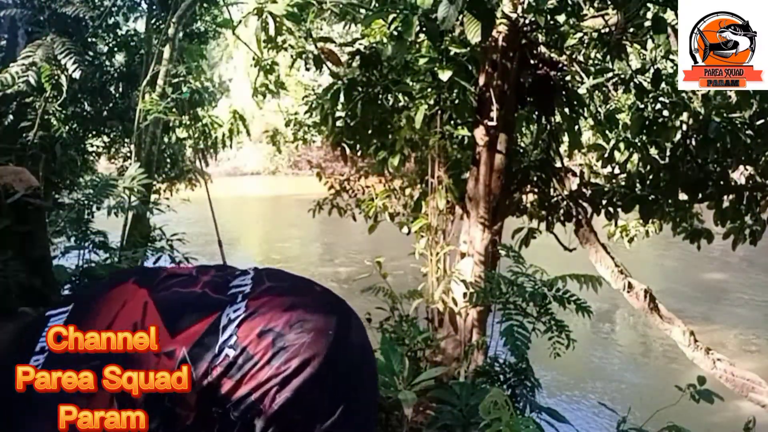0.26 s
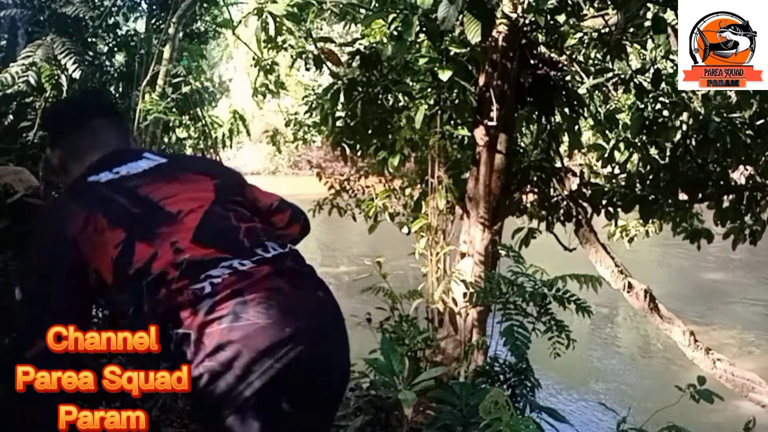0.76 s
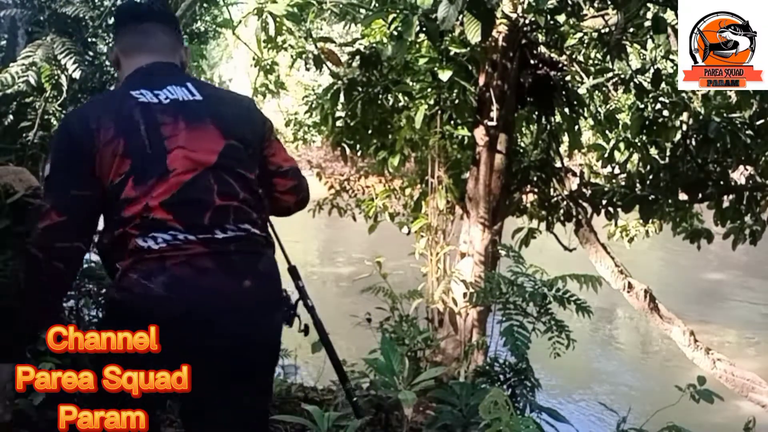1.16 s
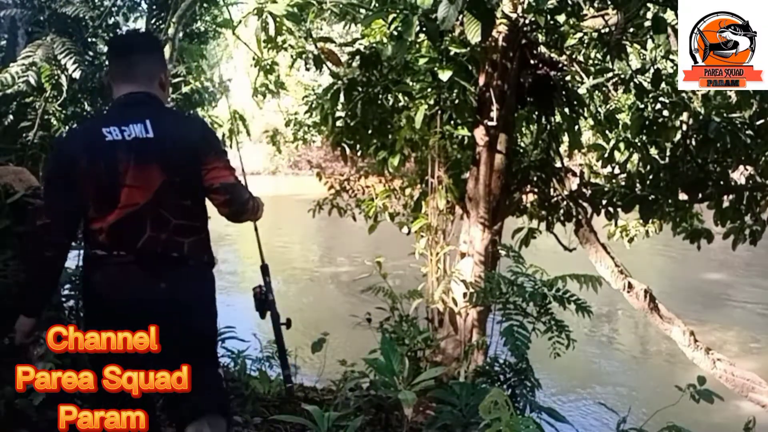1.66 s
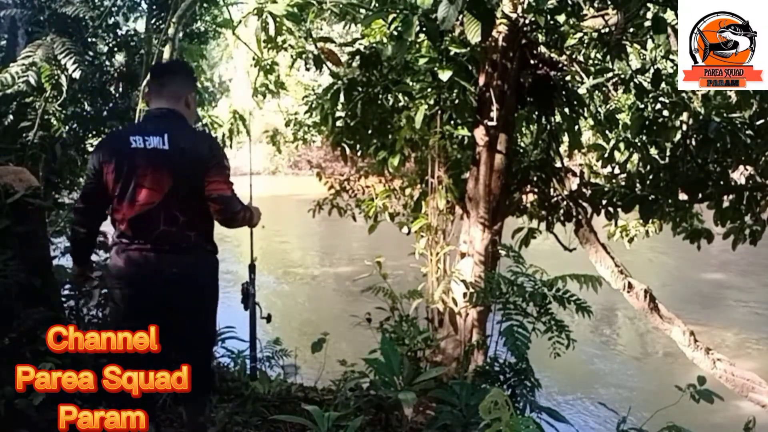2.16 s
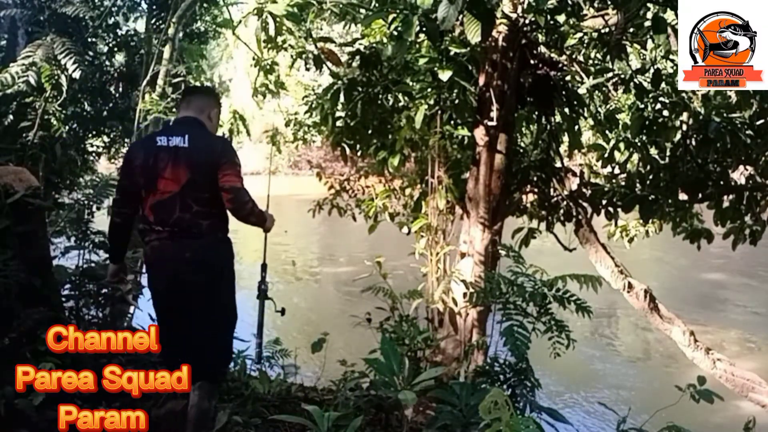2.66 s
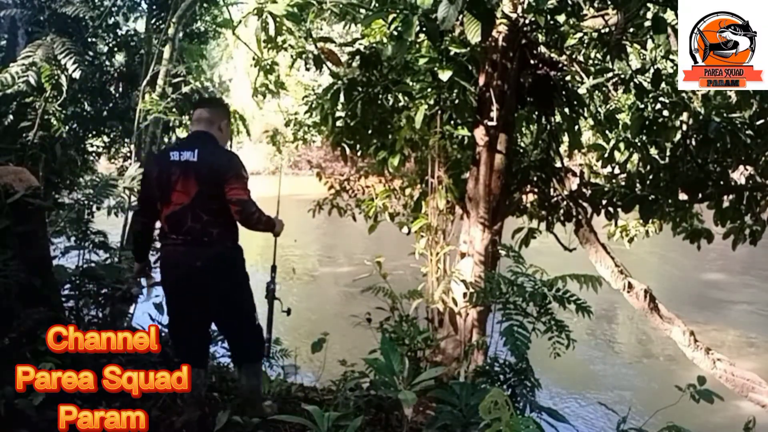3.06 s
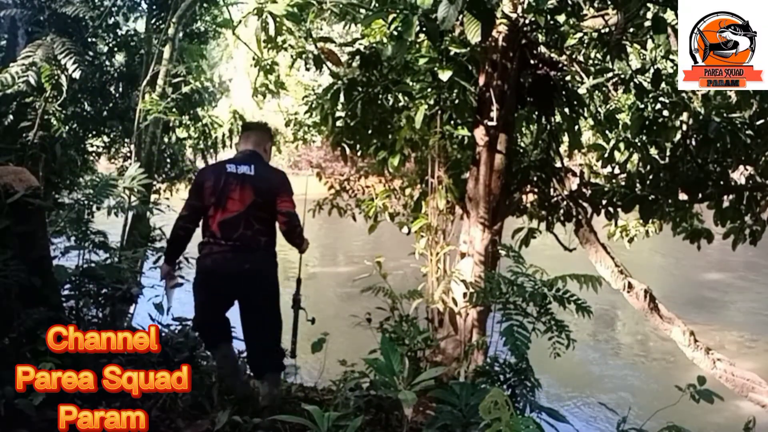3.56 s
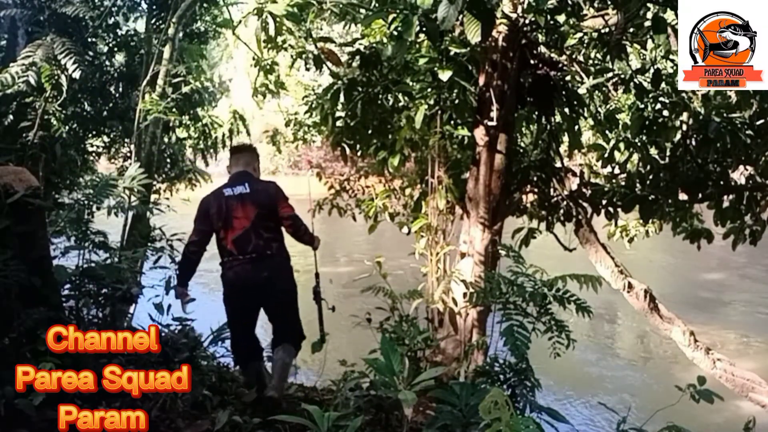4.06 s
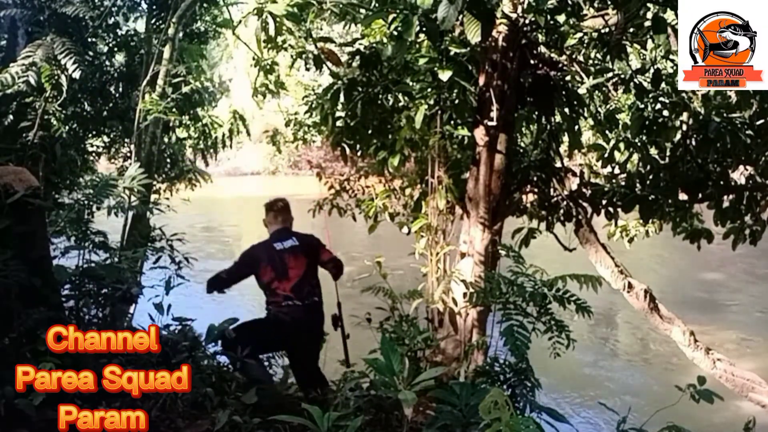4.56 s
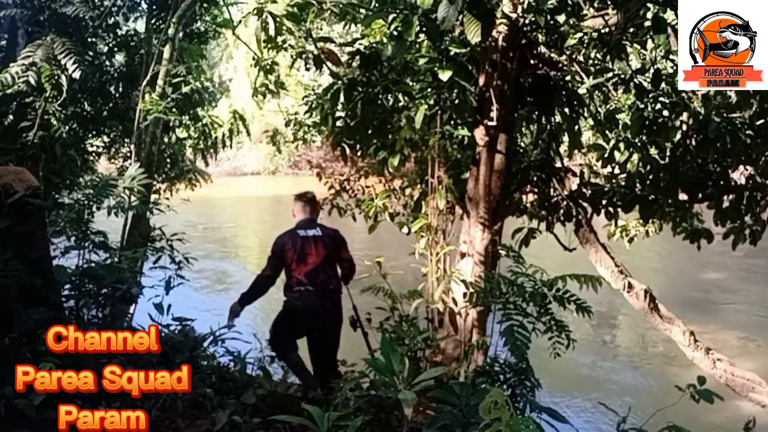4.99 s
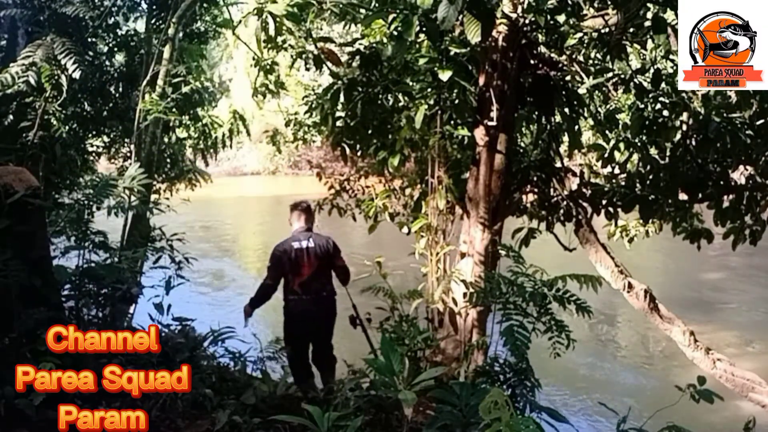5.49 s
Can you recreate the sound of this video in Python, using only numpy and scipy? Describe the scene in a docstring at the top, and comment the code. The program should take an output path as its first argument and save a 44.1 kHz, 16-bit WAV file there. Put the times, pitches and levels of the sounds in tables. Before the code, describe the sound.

Cicadas buzz high and steady in a forest while someone steps through dry leaves, with snapping twigs, dull knocks and faint metal tinkling.

```python
"""A forest by a river. Over a wash of air, water and leaves, a far cicada chorus blurs into a high hiss;
one nearer cicada throbs through it in bursts from its buckling tymbal. Birds whistle far off.
A person with a fishing rod walks through leaf litter: leaves and cloth rustle, soil and wood knock,
twigs snap, a small piece of metal tackle tinkles. Two microphone ports a few centimetres apart."""
import sys
import numpy as np
from scipy import signal
from scipy.fft import rfft, irfft, next_fast_len
from scipy.io import wavfile
from scipy.ndimage import uniform_filter1d

SR = 44100
rng = np.random.default_rng(int(sys.argv[2]) if len(sys.argv) > 2 else 0)


def wrap_up_sound(samples):
    """Save the sound to the file named by the first command line argument, as 16-bit audio."""
    columns = np.atleast_2d(samples).T
    # keep every value between -1 and 1, then stretch to whole-number steps
    tamed = np.clip(columns, -1, 1)
    steps = np.round(tamed * 32767).astype(np.int16)
    wavfile.write(sys.argv[1], SR, steps)


N = 252693
LEFT_LAG_S, WALKER_LEFT_DB = .00014, -1.8  # left port relative to right


def gain_of(db):
    """Decibels to amplitude."""
    return 10 ** (np.asarray(db) / 20)


def unit_rms(x):
    """Scales to rms 1."""
    return x / np.sqrt(np.mean(x ** 2) + 1e-20)


def wobble(noise, span):
    """Noise smoothed twice over span samples, rms 1."""
    return unit_rms(uniform_filter1d(uniform_filter1d(noise, span), span))


def at_hz(points, hz):
    """Reads a table on a log-frequency axis."""
    f, value = np.transpose(points)
    return np.interp(np.log(hz + 1), np.log(f + 1), value)


def envelope(points):
    """Gain per sample from (time [s], level [dB])."""
    return gain_of(np.interp(np.arange(N) / SR, *np.transpose(points)))


def coloured(x, spectrum):
    """Filters by a spectrum table, rms 1."""
    size = next_fast_len(N)
    gain = gain_of(at_hz(spectrum, np.fft.rfftfreq(size, 1 / SR)))
    return unit_rms(irfft(rfft(x, size) * gain, size)[..., :N])


def bandpass(x, edges_hz, order):
    """Butterworth band-pass."""
    return signal.sosfilt(signal.butter(order, edges_hz, "band", fs=SR, output="sos"), x)


def resonate(x, hz, width_hz):
    """One resonance, peak gain about 1."""
    r = np.exp(-np.pi * width_hz / SR)
    return 2 * signal.lfilter([1 - r], [1, -r * np.exp(2j * np.pi * hz / SR)], x).real


def add(mix, s, sound):
    """Mixes a sound in at time s."""
    part = mix[max(round(s * SR), 0):][:len(sound)]
    part += sound[:len(part)]


def at_ports(x, left_db):
    """A source to the right reaches the left port later."""
    size = next_fast_len(N)
    lag = np.exp(-2j * np.pi * np.fft.rfftfreq(size, 1 / SR) * LEFT_LAG_S)
    late = irfft(rfft(x, size) * lag, size)[:N]
    return np.array([late * gain_of(left_db / 2), x * gain_of(-left_db / 2)])


def echoed(x, left_db, wet, t60_s):
    """Direct sound plus scatter off trunks and leaves, different at each port."""
    t = np.arange(SR // 4) / SR
    echoes = rng.standard_normal((2, len(t))) * gain_of(-60 * t / t60_s)
    echoes /= np.linalg.norm(echoes[0])
    return at_ports(x, left_db) + wet * signal.oaconvolve(x[None], echoes, axes=1)[:, :N]


def diffuse(spectrum, balance, patchy_db, flicker_db):
    """Sound from all around: random short-time spectra with drifting patches, partly alike at the ports."""
    # likeness of the ports: (frequency [Hz], coherence [0..1])
    coherence = [(30, 0.64), (120, 0.6), (300, 0.26), (1500, 0.15), (3000, 0.46), (6000, 0.036),
                 (15000, 0.079)]
    frames, hz = N // 256 + 5, np.fft.rfftfreq(1024, 1 / SR)[:, None]
    right_re, right_im, own_re, own_im, drift = rng.standard_normal((frames, 513, 5)).T
    flicker = unit_rms(uniform_filter1d(drift, 60, axis=0))
    patches = unit_rms(uniform_filter1d(uniform_filter1d(drift, 10, axis=0), 12, axis=1))
    alike, lag = at_hz(coherence, hz), np.exp(-2j * np.pi * hz * LEFT_LAG_S)
    right = right_re + 1j * right_im
    left = alike * lag * right + np.sqrt(1 - alike ** 2) * (own_re + 1j * own_im)
    side = gain_of(at_hz(balance, hz) / 2)
    bins = np.array([left * side, right / side])
    bins *= gain_of(at_hz(spectrum, hz) + patchy_db * patches + flicker_db * flicker)
    return unit_rms(signal.istft(bins, nperseg=1024, noverlap=768)[1][:, :N])


def air():
    """Still air, river and far leaves merge into a diffuse wash."""
    # wash spectrum: (frequency [Hz], relative density [dB])
    spectrum = [(25, 2), (50, -11), (70, 3.5), (120, 2), (340, -7), (700, -3.5), (1300, -21.5),
                (2300, -0.5), (3400, -19), (4500, -6), (6500, -60)]
    balance = [(30, -1.5), (300, -5.5), (4000, -1.0)]  # (frequency [Hz], left over right [dB])
    return gain_of(-65) * diffuse(spectrum, balance, patchy_db=3.0, flicker_db=1.5)


def cicada_chorus():
    """Many far cicadas blur into a hiss with an octave overtone."""
    # hiss spectrum: (frequency [Hz], relative density [dB])
    spectrum = [(4600, -32.5), (5050, -19), (5500, -3.5), (5880, 2), (6250, -4), (6500, -15.5),
                (6700, -19.5), (7300, -26.5), (7750, -21), (8400, -59), (10200, -78.5), (10900, -28.5),
                (11750, -20.5), (12700, -29.5), (14300, -38), (15500, -44.5)]
    # slight swell: (time [s], level [dB])
    swell = [(0, -40), (.9, -39.5), (3, -39), (5.73, -39)]
    # port balance: (frequency [Hz], left over right [dB])
    balance = [(4600, 0.5), (5300, -6.5), (5900, 2), (8000, -1.5), (11700, 3), (14000, 1)]
    return envelope(swell) * diffuse(spectrum, balance, patchy_db=0.6, flicker_db=0.5)


def near_cicada():
    """Each beat is a row of bursts of the tymbal's tone; trunks scatter it differently to each port."""
    # song loudness: (time [s], level [dB])
    swell = [(0, -47), (1, -47), (2, -45), (2.8, -44), (3.6, -44), (4.4, -45), (5.1, -46.5), (5.73, -46)]
    # tymbal harmonics: (frequency [Hz], resonance width [Hz], level [dB])
    tymbal = [(5880, 900, 0), (11760, 1200, -26)]
    # bursts in a beat: (position [cycles])
    burst_places = [-.02, .11, .28, .38, .48]
    # burst strengths: (level [dB])
    bursts_db = [0, -6, -3, 0, -7]
    beat_hz, slowing_hz_per_s, burst_width_cycles = 12.59, .054, .055
    jitter_rad, drift_step_rad = .36, .05
    t = np.arange(N) / SR
    beat = t * beat_hz - .605 - slowing_hz_per_s / 2 * (t - 2.8) ** 2
    gate = sum(gain_of(db) * np.exp(-(((beat - place + .5) % 1 - .5) / burst_width_cycles) ** 2)
               for place, db in zip(burst_places, bursts_db))
    gate = np.array([gate, np.roll(gate, 60)])
    # each buckling rib restarts the tone a little out of step
    jitter, drift = rng.standard_normal((2, 2, N))
    slip = jitter_rad * wobble(jitter, 50) + drift_step_rad * np.cumsum(drift, axis=1)
    song = 0
    for k, (hz, width_hz, db) in enumerate(tymbal, start=1):
        tone = gate * np.cos(2 * np.pi * hz * t + k * uniform_filter1d(slip, 30))
        air_sac = resonate(resonate(tone, hz, width_hz), hz, width_hz)
        song += gain_of(db) * unit_rms(air_sac)
    return envelope(swell) * song


def birds():
    """Short gliding whistles, far off."""
    # notes: (time [s], length [s], start pitch [Hz], end pitch [Hz], level [dB])
    notes = [(0.103, 0.047, 710, 730, -65), (0.235, 0.03, 2540, 2500, -62), (0.337, 0.03, 673, 650, -63),
             (1.79, 0.03, 2580, 2550, -60), (2.048, 0.045, 2110, 2020, -57),
             (2.074, 0.045, 1850, 1890, -59), (2.16, 0.04, 1890, 1840, -61), (2.195, 0.03, 1570, 1470, -60),
             (2.383, 0.055, 1430, 1570, -61), (2.422, 0.028, 1770, 1820, -60),
             (2.458, 0.035, 2080, 1940, -58), (5.437, 0.035, 2420, 2760, -55),
             (5.475, 0.035, 2730, 2700, -60), (5.595, 0.04, 2540, 2390, -59),
             (5.63, 0.075, 2195, 2160, -57.5)]
    out = np.zeros(N)
    for s, length_s, from_hz, to_hz, db in notes:
        hz = np.linspace(from_hz, to_hz, round(length_s * SR))
        whistle = np.sin(2 * np.pi * np.cumsum(hz) / SR)
        add(out, s, gain_of(db) * whistle * signal.windows.tukey(len(hz), .7))
    return echoed(out, left_db=-0.5, wet=0.4, t60_s=0.1)


def movement():
    """Gains of the four rustle layers: each move of feet and cloth swells, then dies away."""
    # moves: (peak time [s], swell [s], leaves [dB], ground [dB], swish [dB], crisp treble [dB])
    moves = [(0.535, 0.037, -56.5, -58, -57.5, -60), (0.59, 0.059, -61, -73, -57.5, -68),
             (0.779, 0.12, -53.5, -62.5, -53, -59), (1.436, 0.05, -55.5, -55.5, -49.5, -61),
             (2.161, 0.11, -62.5, -64.5, -62, -75), (2.565, 0.035, -58, -63, -55.5, -65),
             (3, 0.0096, -53.5, -56.5, -62, -85), (3.15, 0.053, -60, -62.5, -81, -90),
             (3.5, 0.18, -63, -61.5, -61.5, -75), (3.64, 0.074, -50, -53.5, -53.5, -52),
             (3.695, 0.04, -54, -63, -57, -55), (3.748, 0.037, -45.5, -53.5, -45.5, -52),
             (4.462, 0.025, -53, -60.5, -53, -52), (4.72, 0.074, -61, -69.5, -82, -96),
             (5.042, 0.034, -46, -51.5, -56, -88), (5.119, 0.048, -48.5, -56.5, -53.5, -71),
             (5.575, 0.097, -55, -62, -62, -93), (5.722, 0.017, -41, -44, -48, -52.5)]
    # stirring between moves, per layer: (level [dB])
    shuffle_db = [-67.5, -72.5, -96.5, -106]
    # higher layers swell and die faster: (slope factor [1])
    briskness = [1.0, 1.0, 1.2, 1.8]
    base_swell_db, base_decay_db_per_s = 8.5, 134.5
    t = np.arange(N) / SR
    power = np.ones(N) * gain_of(shuffle_db)[:, None] ** 2
    for s, swell_s, *levels_db in moves:
        rise_db = base_swell_db * (t - s) / max(swell_s, .01)
        shape_db = np.where(t < s, rise_db, base_decay_db_per_s * (s - t))
        power += (gain_of(levels_db)[:, None] * gain_of(np.outer(briskness, shape_db))) ** 2
    return np.sqrt(power)


def leaf_ring(crackles):
    """Each crackle rings one of a dozen sizes of dry leaf."""
    pitches_hz, ring_share = np.geomspace(1200, 3300, 12), .6
    leaf = rng.integers(0, 12, crackles.shape)
    rings = sum(resonate(crackles * (leaf == k), hz, width_hz=260) for k, hz in enumerate(pitches_hz))
    return ring_share * unit_rms(rings) + (1 - ring_share) * unit_rms(crackles)


def rustle():
    """Feet and cloth make dense crackles in shared clumps; higher bands arrive more scattered."""
    # dry leaves: (frequency [Hz], relative density [dB])
    leaves = [(600, -30.5), (1300, -2), (2300, 9), (3000, 9.5), (3800, -56)]
    # ground underfoot: (frequency [Hz], relative density [dB])
    ground = [(80, -14), (180, -5), (400, 1), (800, 1.5), (1300, -5), (2500, -59)]
    # swish of cloth: (frequency [Hz], relative density [dB])
    swish = [(2400, -18), (3100, 0), (5000, -1), (7500, -7), (8600, -35)]
    # crisp treble: (frequency [Hz], relative density [dB])
    crisp = [(6500, -14.5), (8000, -10.5), (9300, -16.5), (12000, -11), (15500, -16.5)]
    layers = [(leaves, 5000, 2.3, .7), (ground, 2500, 1.2, .4),
              (swish, 3000, 3.2, 1.3), (crisp, 2000, 2.9, 1.3)]
    clump_db, clump_s = 2.5, 0.03
    clumps = unit_rms(gain_of(clump_db * wobble(rng.standard_normal(N), round(clump_s * SR))))
    out = 0
    for gain, (spectrum, crackles_per_s, spread_db, scatter) in zip(movement(), layers):
        size = gain_of(spread_db * np.minimum(rng.exponential(1, (3, N)), 5))
        crackles = size * (rng.random((3, N)) < crackles_per_s / SR) * rng.standard_normal((3, N))
        if spectrum is leaves:
            crackles = leaf_ring(crackles)
        layer = coloured(crackles, spectrum) * gain * clumps
        direct, scattered = layer[0], layer[1:] * gain_of([[WALKER_LEFT_DB], [0]])
        out += at_ports(direct, WALKER_LEFT_DB) + scatter * scattered
    return out


def knocks():
    """A blow and brief crumbling pass two broad, dead resonances of soil and wood."""
    # dull knocks: (time [s], peak [dB], pitch [Hz])
    blows = [(0.458, -47.5, 680), (1.292, -48, 290), (1.465, -42, 646), (1.476, -37, 436),
             (2.017, -49, 455), (2.558, -48, 760), (2.583, -45, 680), (2.7534, -44, 800),
             (2.989, -38.5, 610), (3.016, -50, 251), (3.173, -42.5, 654), (3.417, -38, 715),
             (3.422, -44, 260), (3.449, -40.5, 564), (3.454, -50, 257), (3.596, -41, 708),
             (3.618, -36.5, 745), (3.7364, -24, 720), (3.985, -46.5, 600), (4.453, -46, 318),
             (4.695, -52, 270), (4.977, -41, 790), (5.023, -33, 544), (5.028, -31.5, 390),
             (5.036, -33.5, 357), (5.042, -36, 315), (5.056, -46, 171), (5.409, -44.5, 457),
             (5.507, -47.5, 200), (5.557, -48, 505), (5.707, -50, 109), (5.717, -39, 597)]
    onset_s, blow_width_s, crumble_t60_s = .003, .00043, .035
    out, t = np.zeros(N), np.arange(SR // 10) / SR
    for s, db, hz in blows:
        blow = np.exp(-((t - onset_s) / blow_width_s) ** 2)
        crumble = 1.2 * rng.standard_normal(len(t)) * gain_of(-60 * t / crumble_t60_s) * (t > onset_s)
        force = blow + crumble
        thud = resonate(force, hz, 0.63 * hz) + 0.18 * resonate(force, 0.48 * hz, 0.24 * hz)
        thud = bandpass(thud, [.55 * hz, 2.8 * hz], order=2)
        add(out, s, gain_of(db) * thud / abs(thud).max())
    return at_ports(out, WALKER_LEFT_DB)


def twig_snaps():
    """A dry crack with a short splintering tail, in a woody, a sharp and a thin band."""
    # snaps: (time [s], woody peak [dB], sharp over woody [dB], thin over woody [dB])
    snaps = [(0.5248, -58, 11, 0), (0.531, -49, -6, -8), (1.3098, -56, 8, 10), (1.4052, -60, 24, -10),
             (2.7147, -51, -12, -20), (2.7558, -47, 21, -1), (2.9905, -42.5, -19, -30),
             (3.5055, -48, -1, 4), (3.597, -42, -18, -15), (3.62, -37.5, -3, -9), (3.731, -39, -4, 1),
             (3.7392, -23, -11, -11), (3.7417, -32, -3, -5), (3.7437, -30, -6, -11),
             (3.9834, -43, -25, -34), (4.426, -48, -8, -18), (4.4578, -37, 3, 3), (4.4592, -40, 0, 4),
             (4.4615, -45, 0, 4), (4.978, -39.5, -20, -33), (5.053, -42, -15, -30)]
    bands_hz = [(1300, 2700), (3000, 5500), (8000, 15300)]
    crack_s, splinter_s = .0006, .015
    out, t = np.zeros(N), np.arange(SR // 8) / SR
    for s, db, sharp_db, thin_db in snaps:
        crack = rng.standard_normal(len(t)) * (np.exp(-t / crack_s) + .07 * np.exp(-t / splinter_s))
        for edges_hz, band_db in zip(bands_hz, (0, sharp_db, thin_db)):
            band = bandpass(crack, edges_hz, order=4)
            add(out, s, gain_of(db + band_db) * band / abs(band).max())
    return echoed(out, left_db=-3.5, wet=.25, t60_s=.04)


def tackle():
    """Soft touches feed three modes of a small metal part, in step with what still rings."""
    # touches: (time [s], level [dB], upper mode over first [dB])
    tinkles = [(0.87, -58, -10), (0.95, -64, -8), (1.05, -65, -10), (1.52, -57, -10), (1.64, -41.5, -3),
               (1.655, -46, -2), (1.679, -51, -14), (1.716, -39, -14), (1.757, -40, 4), (1.792, -47, -6),
               (1.829, -48, -9), (1.864, -53, -11), (1.897, -39.5, 1), (1.922, -34, -12), (1.97, -43, -8),
               (1.995, -47, -15), (2.039, -46.5, -4), (2.058, -43, -11), (2.346, -56, 5), (2.67, -60, -7),
               (2.715, -57, 2), (2.955, -62, 3), (3.01, -54, -2), (3.462, -49, 8), (3.483, -50, 2),
               (3.572, -56, -6), (4.696, -50, 8), (4.734, -47, -5), (4.821, -55, -8), (4.862, -60, 2),
               (4.999, -46, -8), (5.03, -57, -7), (5.08, -59, 4), (5.13, -55, -4), (5.195, -62, 6),
               (5.41, -64, 5), (5.461, -61, -8)]
    # a beating pair and an upper mode: (frequency [Hz], t60 [s])
    modes = [(4460, 0.11), (4478, 0.13), (4783, 0.07)]
    touch_s, second_mode_db, sway_step_rad, chatter_db = .005, -9, .045, 2.2
    stir_db, stirs_per_s = -74.5, 46
    out, t = np.zeros(N), np.arange(SR // 3) / SR
    attack = 1 - np.exp(-(t / touch_s) ** 2)
    draws = rng.random((round(stirs_per_s * N / SR), 2))
    stirs = [(when * N / SR, stir_db + 12 * strength, 0) for when, strength in draws]
    for k, (hz, t60_s) in enumerate(modes):
        ring = np.zeros(N)
        for s, db, upper_db in tinkles + stirs:
            mode_db = (0, second_mode_db, upper_db)[k]
            add(ring, s, gain_of(db + mode_db - 60 * t / t60_s) * attack)
        # swinging blurs the pitch
        sway = sway_step_rad * uniform_filter1d(np.cumsum(rng.standard_normal(N)), 100)
        out += ring * np.sin(2 * np.pi * hz * np.arange(N) / SR + sway)
    out *= gain_of(chatter_db * wobble(rng.standard_normal(N), 200))  # loose parts rattle on the metal
    return echoed(out, left_db=-7.0, wet=0.4, t60_s=0.15)


def scene():
    """Air, cicadas, birds and the walker."""
    forest = air() + cicada_chorus() + near_cicada() + birds()
    return forest + rustle() + knocks() + twig_snaps() + tackle()


def record(dry):
    """Microphone bass roll-off, band limit and converter offset."""
    low_cut_hz, edge_hz, dc_offset = 45, 15550, .00107
    thin = signal.sosfilt(signal.butter(2, low_cut_hz, "high", fs=SR, output="sos"), dry)
    band_limit = signal.firwin(1023, edge_hz, window=("kaiser", 11), fs=SR)
    return dc_offset + signal.oaconvolve(thin, band_limit[None], "same")


dry = scene()
out = record(dry)
wrap_up_sound(out)
```